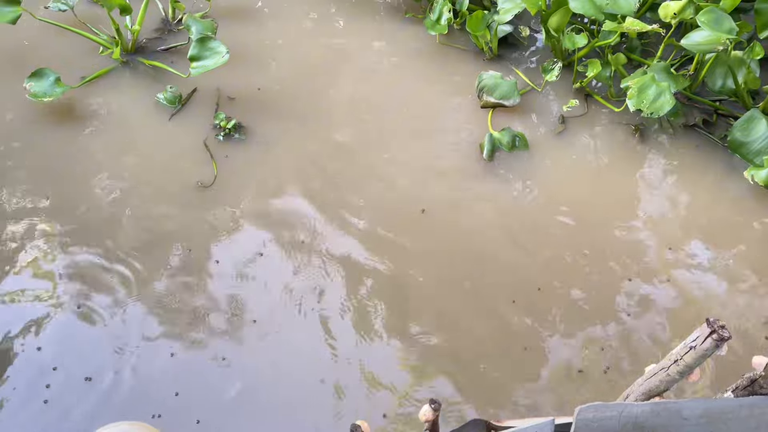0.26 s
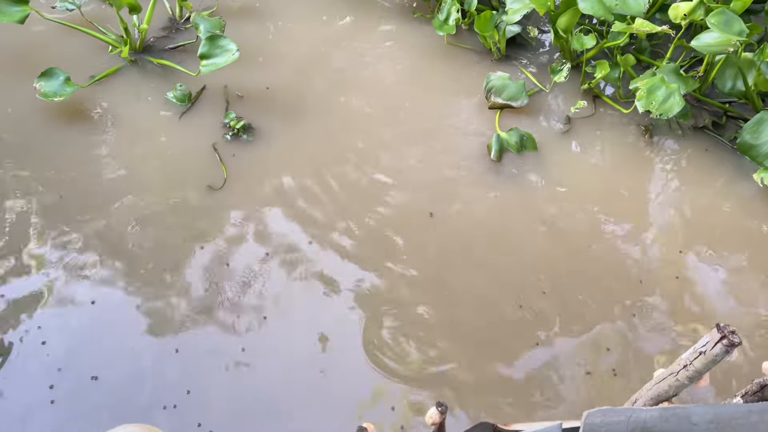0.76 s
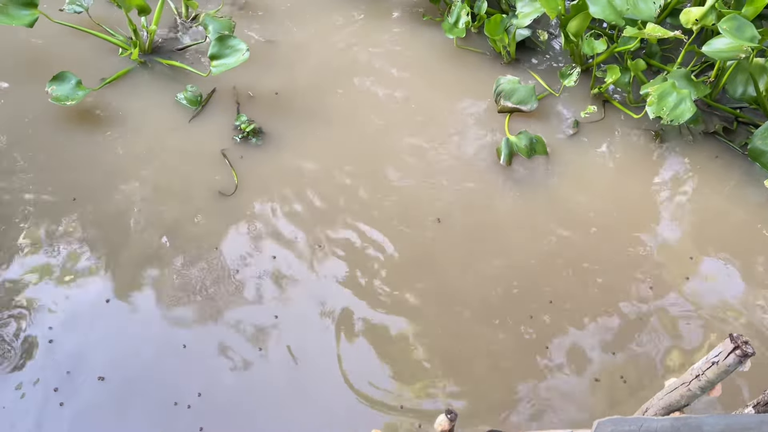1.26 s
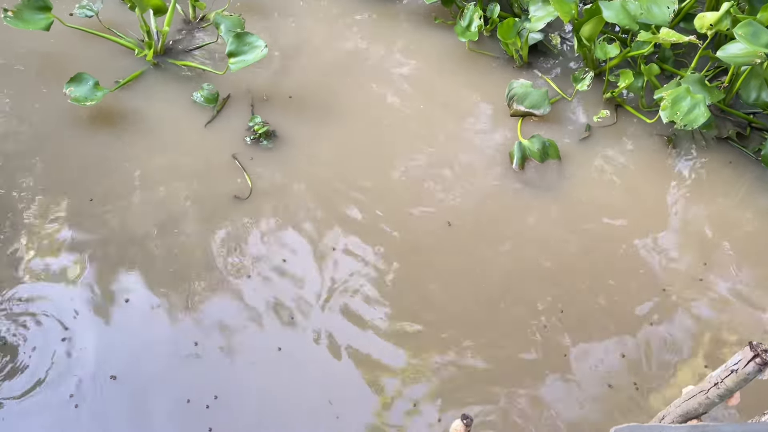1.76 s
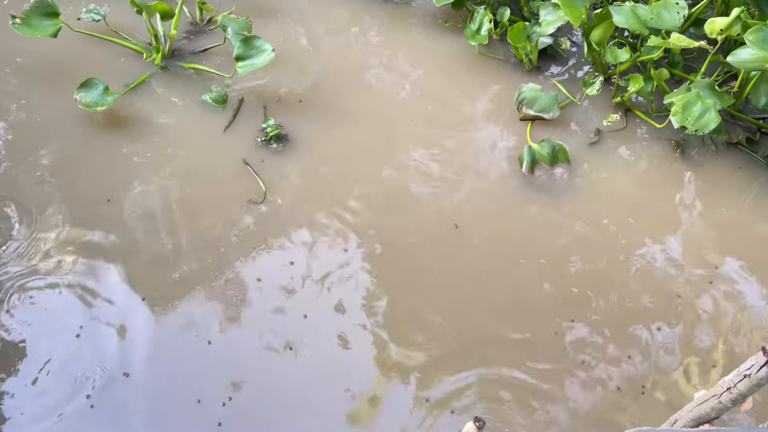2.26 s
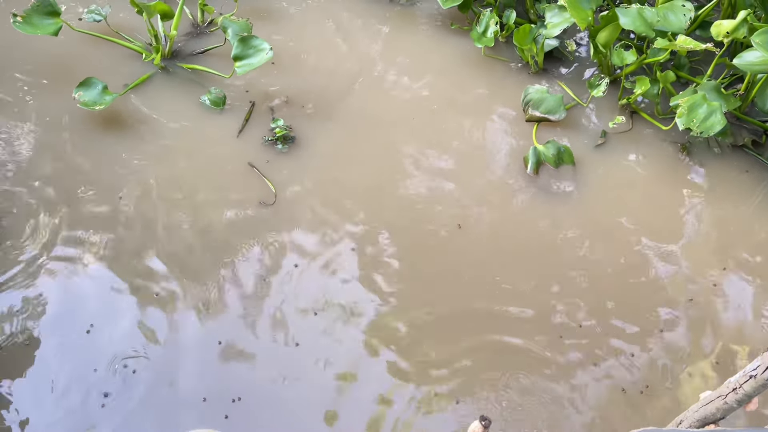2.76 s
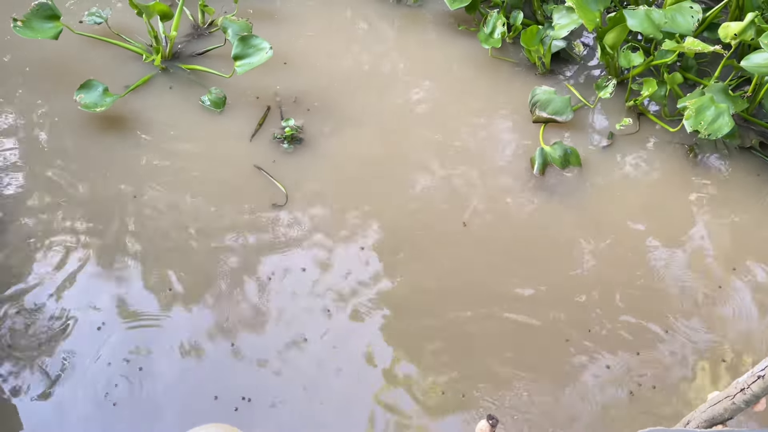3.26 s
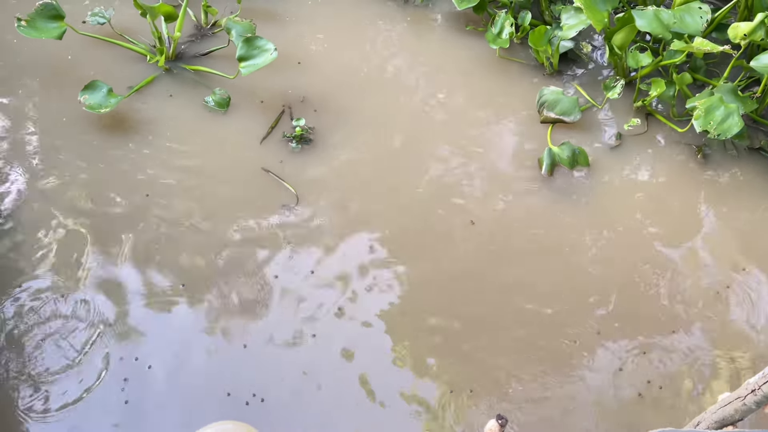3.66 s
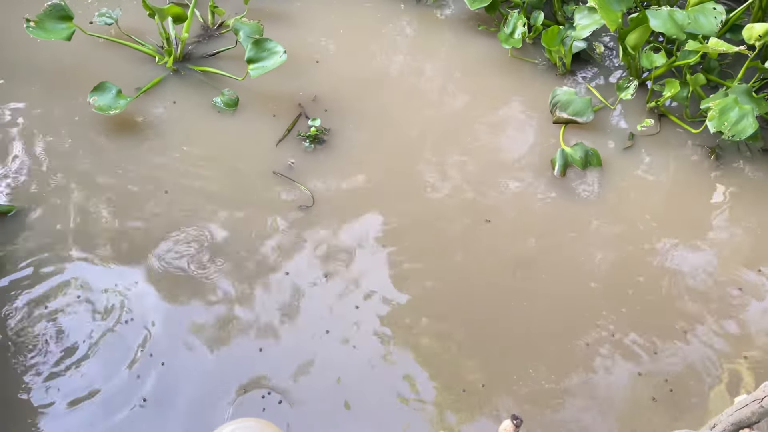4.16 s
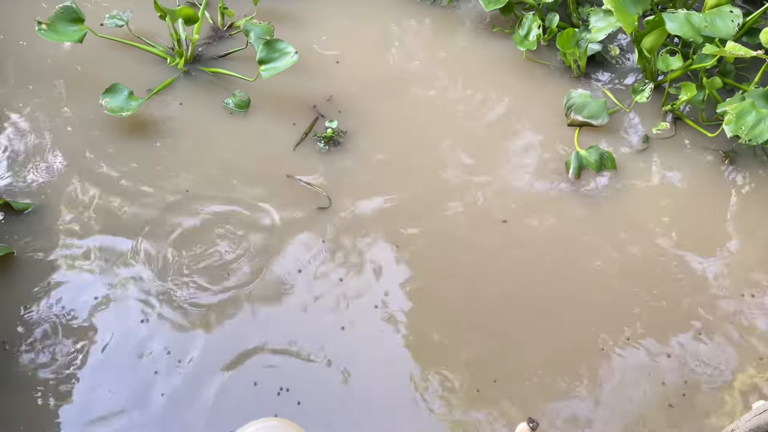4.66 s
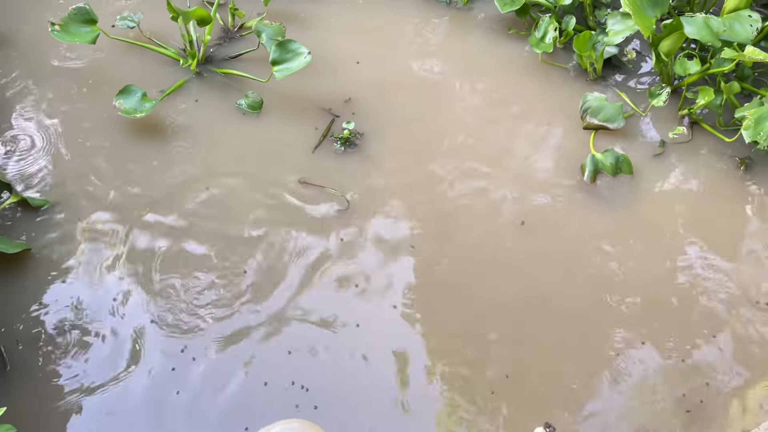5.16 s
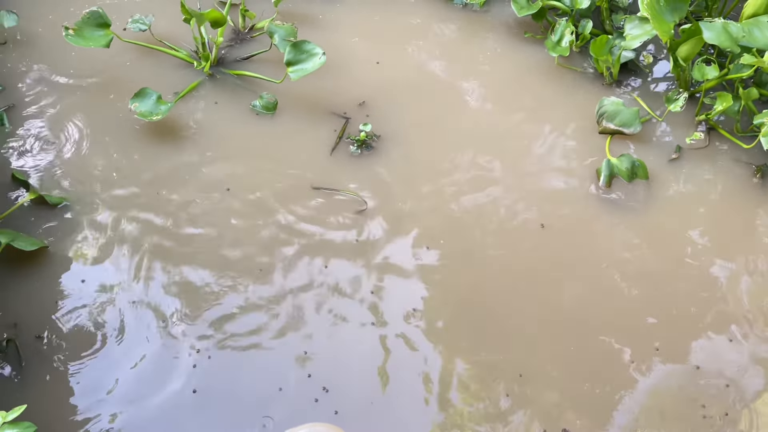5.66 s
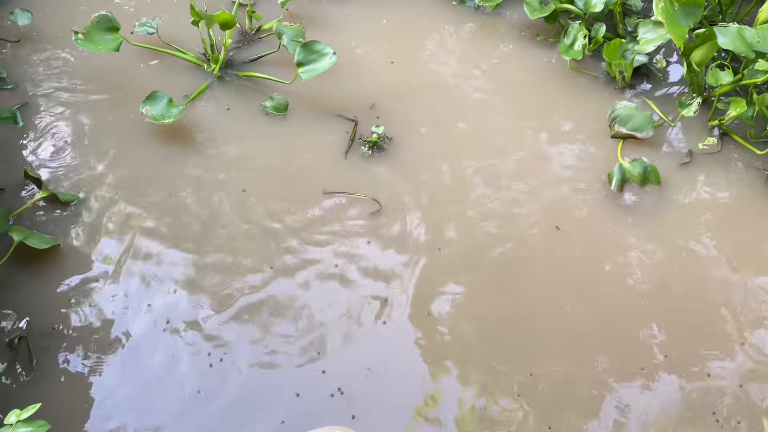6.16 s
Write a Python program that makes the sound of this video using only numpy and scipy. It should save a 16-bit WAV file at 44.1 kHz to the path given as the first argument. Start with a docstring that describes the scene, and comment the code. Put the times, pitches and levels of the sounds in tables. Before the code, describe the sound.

A close stereo microphone just above a muddy pond hears small drops tick and bubbles ring. A fizzing splash comes first, then a deep gulp with rising bloops near one second, and the strongest gurgle just after. Later only scattered plips remain. Low wind rumble swells and sinks behind, with soft airy hiss, a thin high insect whine and faint far bird-like whistles.

```python
"""A muddy pond, heard close above the water by a small stereo microphone with two ports.
Drops crack on the surface and bubbles ring as sliding, damped sines; air pockets gulp as gliding tones.
Splashes fizz and gurgle with thousands of tiny bubble grains.
Behind them wind rumbles on the ports in noise gusts, air hisses, insects sing high up
as a narrow noise band and a thin sine, and far notes whistle faintly in echo."""
import sys
import numpy as np
from scipy import signal
from scipy.fft import rfft, irfft, next_fast_len
from scipy.io import wavfile
from scipy.ndimage import map_coordinates

SR = 44100
rng = np.random.default_rng(int(sys.argv[2]) if len(sys.argv) > 2 else 0)


def undo_db(level):
    """Turn decibels back into plain size, where 20 dB means ten times bigger."""
    steps = np.asarray(level, float) / 20
    return 10 ** steps


def log_audio(samples):
    """Write samples as a 16-bit WAV file to the path given in sys.argv[1]."""
    # one column per channel
    frames = np.atleast_2d(samples).T
    # limit to full scale, then quantise
    limited = np.clip(frames, -1, 1)
    pcm = np.round(limited * 32767).astype(np.int16)
    wavfile.write(sys.argv[1], SR, pcm)


N = 282668


def unit(x):
    """Scaled to rms 1."""
    return x / np.sqrt(np.mean(x ** 2) + 1e-20)


def along(points, hz):
    """Reads (f/Hz, value) points on a log frequency axis."""
    f, value = np.transpose(points)
    return np.interp(np.log(hz + 1), np.log(f + 1), value)


def curves(rows):
    """Draws one value per sample for each column after the time."""
    s, *columns = np.transpose(rows)
    return [np.interp(np.arange(N) / SR, s, column) for column in columns]


def wobble(rate):
    """A smooth random curve with rate knots a second."""
    knots = rng.standard_normal(int(N * rate / SR) + 4)
    return map_coordinates(knots, [np.arange(N) * rate / SR])


def filtered(x, response):
    """Shapes x by a response of frequency."""
    size = next_fast_len(x.shape[-1] + 8192)
    spectrum = rfft(x, size) * response(np.fft.rfftfreq(size, 1 / SR))
    return irfft(spectrum, size)[..., :x.shape[-1]]


# Likeness of the noise at the two ports: [f/Hz, correlation]
PORT_LIKENESS = [(60, 0.99), (350, 0.97), (700, 0.88), (1200, 0.033), (5000, 0.45), (7500, 0.35),
                 (8700, 0.4), (10200, 0.93)]
# Lean of the noise between the ports: [f/Hz, left over right level/dB]
PORT_LEAN = [(60, -1.0), (350, 0.0), (700, 0), (1200, 3), (6200, 6.5), (7600, .5)]


def stereo_noise(spectrum):
    """Air noise of rms 1: mid and side shares set how alike the ports are at each frequency."""
    def shares(hz):
        turn = np.arccos(np.clip(along(PORT_LIKENESS, hz), -1, 1)) / 2
        return undo_db(along(spectrum, hz)) * [np.cos(turn), np.sin(turn)]

    mid, side = filtered(rng.standard_normal((2, N)), shares)
    pair = np.array([mid + side, mid - side])
    return unit(filtered(pair, lambda hz: undo_db(np.outer([.5, -.5], along(PORT_LEAN, hz)))))


def glide(rows):
    """A sine following (t/s, f/Hz, rms level/dB) rows, silent outside them."""
    hz, db = curves(rows)
    t = np.arange(N) / SR
    edge = np.clip(np.minimum(t - rows[0][0], rows[-1][0] - t) / 0.00084, 0, 1)
    return np.sqrt(2) * edge * undo_db(db) * np.sin(2 * np.pi * np.cumsum(hz) / SR)


# Echo decay of the bank and plants: [f/Hz, t60/s]
BANK_DECAY = [(300, 0.31), (5000, 0.42), (12000, 0.0062)]


def echo(x):
    """A short diffuse answer from bank and plants, different at each port; the treble dies first."""
    hz, t, noise = signal.stft(rng.standard_normal((2, SR // 3)), SR, nperseg=256)
    decay = undo_db(-60 * t / along(BANK_DECAY, hz)[:, None])
    tail = signal.istft(noise * decay, SR, nperseg=256)[1]
    late = np.pad(x, (250, 0))[None]  # samples before the answer begins
    return signal.fftconvolve(late, tail / np.linalg.norm(tail[0]), axes=1)[:, :N]


# Spectrum of the far outdoor hiss: [f/Hz, relative level/dB per Hz]
AIR_SPECTRUM = [(700, -88), (1500, -5.5), (3700, -10), (5300, -7), (7200, -10), (9700, -14.5), (11300, -20),
                (12500, -7), (13500, -60), (22000, -120)]


def air():
    """Far outdoor hiss: shaped noise whose level drifts gently."""
    return undo_db(-50.5 + .6 * wobble(3.26)) * stereo_noise(AIR_SPECTRUM)


# Gusts: [t/s, level/dB before the lumps]
GUSTS = [(0, -28), (.66, -37.5), (.84, -31), (1.31, -30.5), (1.42, -46.5), (2.2, -42.5), (2.95, -45),
         (3.6, -36), (4, -32), (4.7, -29.5), (5.22, -32.5), (5.6, -30.5), (6.41, -32)]
# Low buffeting: [f/Hz, relative level/dB per Hz]
RUMBLE_SPECTRUM = [(25, -40), (49, 2.5), (75, 4.5), (140, -2.5), (204, -25), (300, -36), (550, -120)]
# Lighter rush on top: [f/Hz, relative level/dB per Hz]
RUSH_SPECTRUM = [(88, -26), (150, -7.5), (224, -11), (1250, -24), (2000, -34), (4400, -120)]


def wind():
    """Gusts buffet the ports in lumps of low noise; a lighter rush rides on top and swings less."""
    gust_db, = curves(GUSTS)
    lumps_db = 0.9 * wobble(7.9) + 0.41 * wobble(16)
    rumble = undo_db(gust_db + lumps_db) * stereo_noise(RUMBLE_SPECTRUM)
    rush_db = -43.5 + 0.28 * (gust_db - gust_db.mean())  # follows a share of the gusts' swing
    return rumble + undo_db(rush_db + 0.93 * wobble(13)) * stereo_noise(RUSH_SPECTRUM)


# Phrases of the buzzing band: [start t/s, end t/s, level/dB]
INSECT_PHRASES = [(0, 2.83, -62), (3.4, 4.35, -60.5), (5.1, 6.1, -61.5)]
# Middles of the thin singer's short rests: [t/s]
SINGER_RESTS = [.87, 2.15, 2.79, 4.75, 5.35, 6.02]


def insects():
    """A narrow noise band buzzes in phrases; a thin wavering sine above it takes short rests."""
    edge_db_per_s, singer_hz, rest_s = 63, 9420, 0.091
    t = np.arange(N) / SR
    band = filtered(rng.standard_normal((2, N)), lambda f: 1 / (1 + ((f - 8060) / 110) ** 2))
    buzz = unit(band[0] + 0.35 * band[::-1])
    phrases = 0
    for s, end, db in INSECT_PHRASES:
        outside_s = np.minimum(np.minimum(t - s, end - t), 0)
        phrases = phrases + undo_db(db + edge_db_per_s * outside_s)
    rests = [np.clip(3 * (abs(t - s) / rest_s * 2 - .7), 0, 1) for s in SINGER_RESTS]
    tone = np.sin(2 * np.pi * np.cumsum(singer_hz + 12 * wobble(30)) / SR)
    thin = np.prod(rests, axis=0) * undo_db(3.7 * wobble(45)) * tone
    return phrases * buzz + undo_db(-63.5) * unit(thin)


# Far whistled notes, perhaps birds: [t/s, length/s, start f/Hz, end f/Hz, peak level/dB before mixing]
WHISTLED_NOTES = [(1.56, .17, 2740, 2730, -59), (1.812, 0.17, 2740, 2730, -62),
                  (2.435, .08, 2300, 2420, -55), (2.71, 0.085, 1380, 1360, -53),
                  (2.77, 0.05, 2350, 2360, -50), (2.795, .065, 2460, 2700, -52),
                  (3.64, 0.12, 1370, 1380, -53), (5.675, .06, 2050, 2450, -56)]


def whistles():
    """Each note swells and fades along its glide, wavering and breathy, deep in echo."""
    peak_share, swell_db, fade_db = .45, 8, 10  # where a note peaks, its rise and its fall
    song = 0
    for s, length, hz, end_hz, db in WHISTLED_NOTES:
        peak_hz = hz + peak_share * (end_hz - hz)
        song = song + glide([(s, hz, db - swell_db),
                             (s + peak_share * length, peak_hz, db),
                             (s + length, end_hz, db - fade_db)])
    song = song * undo_db(3 * wobble(60))
    song = song * (1 + .35 * wobble(500))  # breath spreads each line
    return undo_db(-2) * song + undo_db(-6) * echo(song)


def grains(centre_hz, spread, cycles, scatter_db, count):
    """Small bubbles a few cycles long burst at random times and places, rising slightly; rms 1."""
    when, side = rng.random((count, 2)).T
    pitch, level = rng.standard_normal((count, 2)).T
    hz = np.clip(centre_hz * np.exp(spread * pitch), 400, 10900)[:, None]
    turns = hz * np.arange(400) / SR
    shape = np.exp(-turns / cycles) * (1 - np.exp(-turns))
    ring = np.sin(2 * np.pi * turns * (1 + 0.00096 * turns))
    sound = undo_db(scatter_db * level[:, None]) * shape * ring
    at = ((when * N).astype(int)[:, None] + np.arange(400)).ravel()
    pans = np.cos(.63 + .3 * side), np.sin(.63 + .3 * side)
    return unit(np.array([np.bincount(at, (sound * pan[:, None]).ravel(), N + 400)[:N] for pan in pans]))


# Splashes that churn the water: [t/s, length/s, fine froth starting level/dB, gurgle starting level/dB]
CHURNS = [(0.274, 0.35, -45.5, -41.5), (1.094, 0.14, -49, -43.5), (1.25, 0.093, -47, -34.5),
          (1.684, 0.015, -45, -57), (3.135, 0.12, -59, -57), (3.256, 0.011, -42.5, -49)]


def froth():
    """Bright froth over larger gurgling bubbles; each splash rises fast, sags while it lasts and drains."""
    rise_db_per_s, drain_db_per_s, fine_sag_db, gurgle_sag_db = 372, 232, 5.5, 12.5
    t = np.arange(N) / SR
    fine, gurgle = np.zeros((2, N))
    for s, length, fine_db, gurgle_db in CHURNS:
        rise_db = rise_db_per_s * np.minimum(t - s, 0)
        edges_db = rise_db - drain_db_per_s * np.maximum(t - s - length, 0)
        done = np.clip((t - s) / length, 0, 1)
        fine = np.hypot(fine, undo_db(fine_db + edges_db - fine_sag_db * done))
        gurgle = np.hypot(gurgle, undo_db(gurgle_db + edges_db - gurgle_sag_db * done))
    bright = fine * grains(8760, 0.49, 5.1, 0.53, count=7000)
    return bright + gurgle * grains(1275, 0.407, 19, 2.5, count=6000)


# Air pockets, one list of rows each: [t/s, f/Hz, rms level/dB before panning]
AIR_POCKETS = [
    [(.805, 240, -41), (.822, 362, -40.5), (.836, 445, -29)],
    [(.803, 1700, -50), (.813, 1890, -44.5), (.835, 1150, -50)],
    [(.862, 950, -41), (.877, 1084, -40), (.895, 1400, -51)],
    [(.93, 245.6, -33.5), (.96, 321, -33.5), (.978, 559, -29), (.993, 754, -22.5), (.999, 828, -33),
     (1.018, 990, -38.5), (1.035, 1165, -46)],
]


def gulps():
    """Air pockets sound as sines whose pitch glides as they close, heard towards the right."""
    return sum(map(glide, AIR_POCKETS)) * undo_db(np.array([[-2.7], [2.7]]))


# Where the water is stirred: [t/s, left over right level/dB]
STIRRED_SIDE = [(.7, 1.5), (.82, -5), (1.1, 0), (1.55, 2.5)]


def add(out, s, sound):
    """Places a sound of the water at time s, from where it is stirred then."""
    at = round(s * SR)
    lean_db = np.interp(s, *np.transpose(STIRRED_SIDE))
    out[:, at:at + sound.shape[-1]] += undo_db(np.array([[.5], [-.5]]) * lean_db) * sound


# Drops striking the surface: [t/s, crack peak level/dB before panning, centre f/Hz]
DROP_STRIKES = [(0.353, -32, 6540), (0.4375, -31, 5600), (0.4883, -24.5, 7700), (1.165, -30, 5130),
                (1.1986, -27.5, 7850), (1.261, -32, 5700), (1.282, -30.5, 8500), (1.324, -29, 9200),
                (1.5457, -31, 8350), (1.554, -34, 8700), (1.6588, -29.5, 9000), (2.534, -23, 8400),
                (3.002, -35, 5130), (3.129, -25, 4530), (3.1904, -34, 9300), (3.3735, -29, 11300),
                (3.939, -35, 9600), (5.291, -37, 8500), (5.675, -30.5, 8800), (5.777, -35, 9200)]


def ticks():
    """Each impact is a very short noise crack around its own centre, with a thin, longer spray."""
    out, t = np.zeros((2, N + SR)), np.arange(SR // 5) / SR
    for s, db, hz in DROP_STRIKES:
        noise = filtered(rng.standard_normal((3, len(t))),
                         lambda f: 1 / (1 + (np.log2((f + 1) / hz) / 0.4) ** 2))
        crack = noise[0] * undo_db(-60 * t / 0.0078) * (1 - np.exp(-t / 0.00019))
        spray = unit(noise[0] + 0.77 * noise[1:]) * undo_db(-13.5 - 60 * t / 0.1)
        add(out, s, undo_db(db) * (crack / np.abs(crack).max() + spray))
    return out[:, :N]


# Ringing bubbles: [t/s, nominal level/dB, start f/Hz, end f/Hz, t60/s]
BUBBLE_RINGS = [(.265, -38, 5530, 5500, 0.017), (.268, -36.5, 776, 1290, 0.09),
                (.284, -33.5, 3630, 3480, 0.021), (0.289, -33, 905, 1090, 0.034),
                (.345, -42, 2500, 2550, 0.023), (0.37, -32.5, 875, 1335, 0.13),
                (.371, -32, 3460, 3450, 0.029), (0.47, -36.5, 1810, 1710, 0.058),
                (0.493, -33.5, 5560, 5700, 0.028), (0.502, -28.5, 1460, 1360, 0.05),
                (.59, -44, 1115, 1110, 0.16), (0.795, -33, 1450, 1500, 0.041), (.836, -27, 878, 929, 0.16),
                (.836, -15.5, 303, 156, 0.05), (1.092, -33, 1890, 1960, 0.027),
                (1.097, -21.5, 1920, 2000, 0.033), (1.154, -39, 2800, 2770, 0.032),
                (1.166, -23, 1180, 990, 0.039), (1.187, -25.5, 1930, 2270, 0.039),
                (1.241, -16.5, 770, 820, 0.053), (1.242, -23, 1140, 1230, 0.038),
                (1.249, -19, 845, 760, 0.034), (1.25, -15, 1278, 1335, 0.049),
                (1.254, -27.5, 658, 674, 0.11), (1.269, -18, 700, 825, 0.0079),
                (1.547, -32, 4570, 4560, 0.012), (1.555, -29, 2630, 2510, 0.0075),
                (1.555, -30.5, 1740, 1690, 0.022), (1.664, -34, 1110, 1090, 0.019),
                (1.693, -34.5, 1370, 1290, 0.035), (3.128, -26.5, 4730, 4750, 0.025),
                (3.13, -22.5, 2700, 2780, 0.0069), (3.165, -34.5, 1300, 1250, 0.041),
                (3.193, -26.5, 1660, 1570, 0.013), (3.194, -29.5, 2800, 3350, 0.014),
                (3.195, -39.5, 822, 1080, 0.114), (3.204, -41, 1700, 1740, 0.068),
                (3.247, -42.5, 2930, 3000, 0.041), (3.254, -27.5, 4920, 4800, 0.011),
                (3.418, -31, 610, 690, 0.031), (3.737, -32.5, 1680, 2300, 0.035),
                (3.938, -21, 1170, 1010, 0.011), (4.188, -41, 802, 940, 0.14),
                (4.661, -19, 1310, 1160, 0.01), (4.665, -23.5, 664, 576, 0.02),
                (4.767, -42.5, 3700, 3620, 0.034), (4.825, -35.5, 4830, 4960, 0.014),
                (5.65, -38.5, 2070, 2050, 0.037)]


def bubbles():
    """Each bubble pinches off with a knock and rings as a damped sine, sliding in pitch near the surface."""
    out, t = np.zeros((2, N + SR)), np.arange(SR // 4) / SR
    flutter = undo_db(1.5 * wobble(160))  # the rocking surface shakes each ring
    for s, db, hz, end_hz, t60 in BUBBLE_RINGS:
        pitch = hz + (end_hz - hz) * np.minimum(t / (0.345 * t60), 1)
        swell = 1 - np.exp(-t * hz / 1.5)  # over a few cycles
        shake = np.resize(flutter[round(s * SR):], len(t))
        ring = undo_db(3.5 - 60 * t / t60) * swell * shake * np.sin(2 * np.pi * np.cumsum(pitch) / SR)
        knock = unit(filtered(rng.standard_normal(len(t)),
                              lambda f: 1 / (1 + (np.log2((f + 1) / hz) / 0.5) ** 2)))
        knock_db = -7 - 170 * t60 - 60 * t / .012  # short rings come with harder knocks
        add(out, s, undo_db(db) * (ring + undo_db(knock_db) * knock))
    return out[:, :N]


def scene():
    """Drops, bubbles and gulps close by with their echo, over froth, wind, air, insects and far whistles."""
    water = bubbles() + ticks() + gulps()
    near = water + undo_db(-10.5) * echo(water.mean(axis=0))
    return near + froth() + wind() + air() + insects() + whistles()


def roll_off(x):
    """The treble ends steeply here."""
    return signal.sosfilt(signal.butter(12, 12870, fs=SR, output="sos"), x)


# Path difference between the ports: [f/Hz, phase/rad, positive where left leads]
PORT_PHASE = [(40, -.33), (320, -.72), (1500, -1.05), (7000, -.9), (8800, -.1), (9500, -1.6), (9800, -3),
              (10500, -3.3), (11300, -6.2)]


def record(dry):
    """Treble reaches the ports out of step, cancelling in the middle near 10 kHz; the top rolls off."""
    def response(hz):
        lag = np.exp(1j * np.outer([.5, -.5], along(PORT_PHASE, hz)))
        return lag / (1 + (hz / 12000) ** 24)

    return roll_off(filtered(dry, response))


dry = scene()
out = record(dry)
log_audio(out)
```